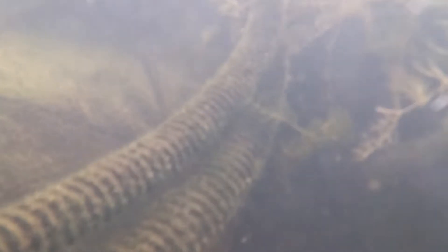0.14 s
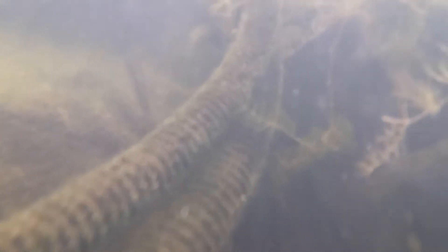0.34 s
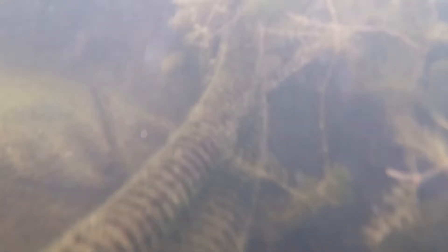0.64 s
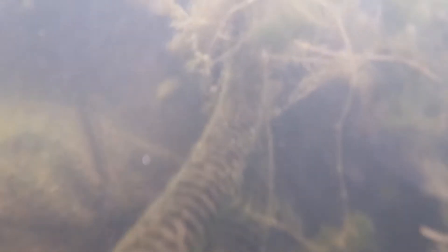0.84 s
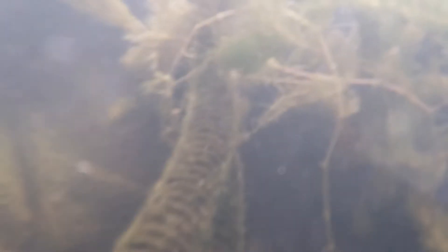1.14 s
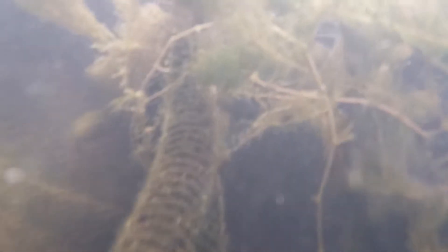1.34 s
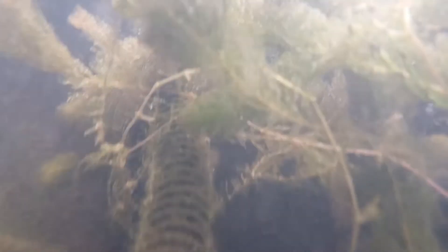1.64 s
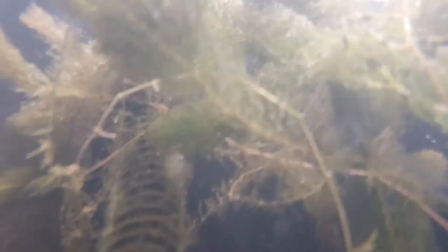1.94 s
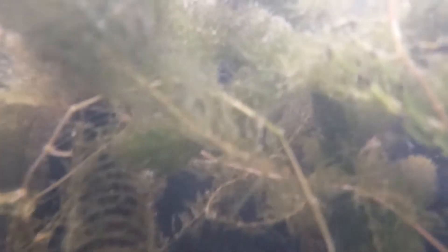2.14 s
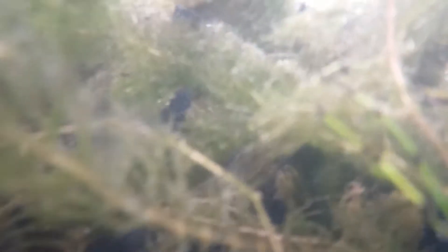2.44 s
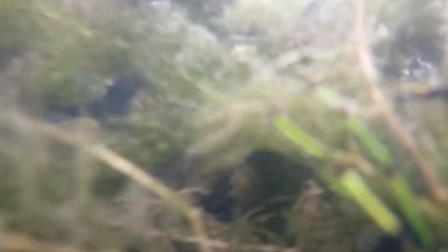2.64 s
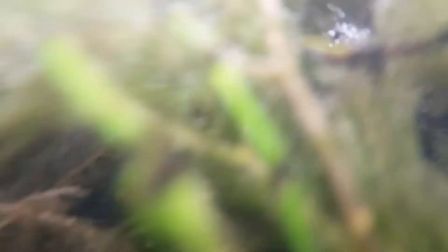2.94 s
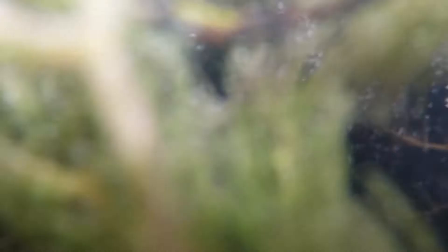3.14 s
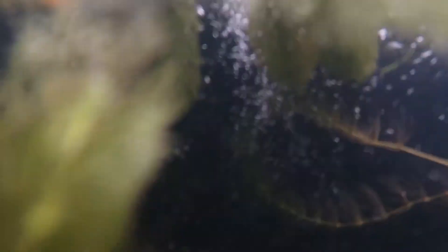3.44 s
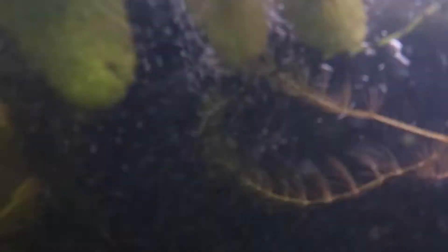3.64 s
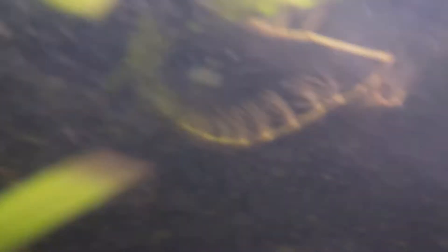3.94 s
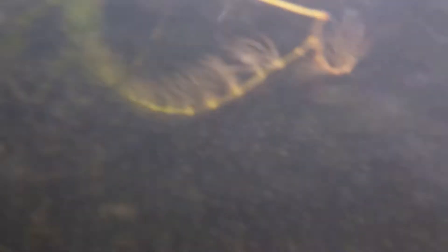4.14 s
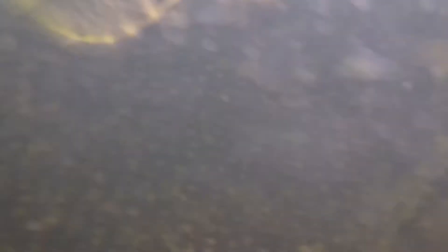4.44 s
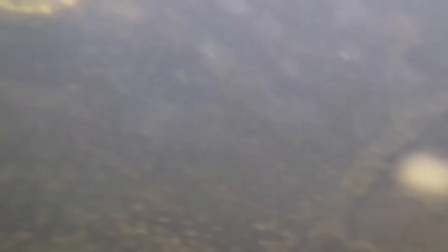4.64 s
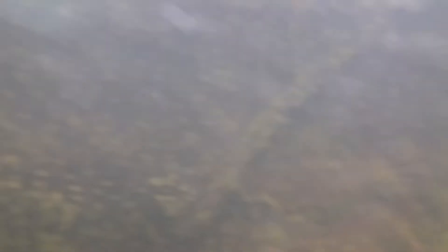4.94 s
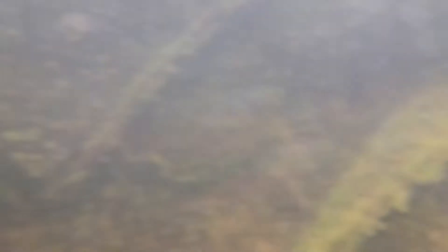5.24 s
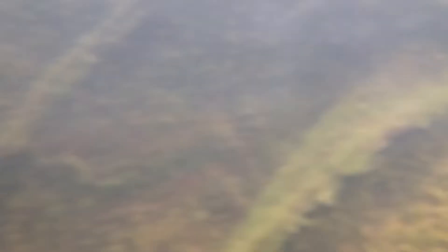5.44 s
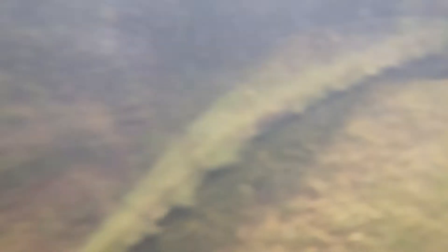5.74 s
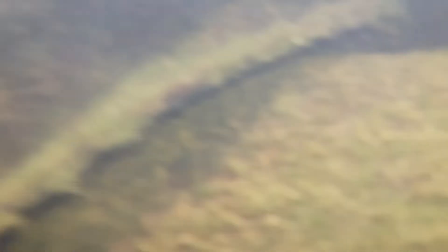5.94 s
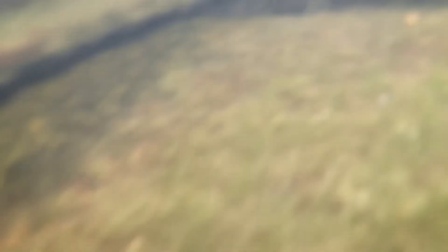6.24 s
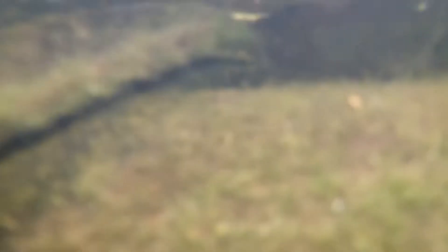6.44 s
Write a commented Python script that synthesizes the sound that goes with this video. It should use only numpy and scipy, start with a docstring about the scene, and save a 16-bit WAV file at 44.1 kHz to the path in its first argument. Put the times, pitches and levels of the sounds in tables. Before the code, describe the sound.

A steady deep electric hum under water, scattered bubble pings, heavy soft bumps and leafy crackle midway, gurgling gulps, and a closing burst of thuds and taps.

```python
"""Underwater glide past a pond pump

A camera glides through a pond while a mains pump hums and buzzes and its rotor ticks in filtered noise.
Bubbles ping all around as dying sines with quick echoes. Weed rustles over the case in clumps of tiny
clicks and bumps it with low swells; the inflow gurgles by in ringing grains and gulps of air.
Hard taps tick and ring the case, most thickly near the end, over rumbling water, wash and hiss."""
import sys
import numpy as np
from scipy import signal
from scipy.fft import rfft, irfft, next_fast_len
from scipy.io import wavfile
from scipy.ndimage import uniform_filter1d

SR = 44100
rng = np.random.default_rng(int(sys.argv[2]) if len(sys.argv) > 2 else 0)


def output_pcm(signal):
    """Save a mono or channel-first signal as 16-bit PCM at the path in sys.argv[1].

    Samples are clipped to [-1, 1] before scaling.
    """
    pcm = np.clip(np.atleast_2d(signal).T, -1, 1) * 32767
    wavfile.write(sys.argv[1], SR, np.round(pcm).astype(np.int16))


N = 290619
T = np.arange(N) / SR  # time in seconds

# Water flowing round the case, following the camera's speed, before the flow trim: start_s, level_db
FLOW_LEVEL = [(0.0, -46), (1.62, -38.5), (2.67, -39), (3.07, -34), (3.54, -35), (3.88, -30.5), (5.28, -39),
              (6.0, -44.5), (6.21, -43), (6.26, -29), (6.59, -32)]
# Tone of the flow's rumble: freq_hz, level_db
FLOW_TONE = [(20, -33), (35, -13.5), (50, -9), (75, -6), (110, -1.5), (155, -1), (200, -9.5), (270, -21.5),
             (400, -26.5), (700, -38.5)]
# Tone of the pond's far wash: freq_hz, level_db
WASH_TONE = [(200, 9), (450, 6.5), (700, -4.5), (1000, 8), (1150, 4), (1350, 6), (1800, -11), (2600, -24),
             (3500, -17), (5000, -40), (8000, -47.5)]
# Tone of the microphone noise: freq_hz, level_db
HISS_TONE = [(100, -6.5), (5000, -1), (9000, 3.5), (16000, 4)]
# Single bubbles standing out, of many sizes: start_s, pitch_hz, level_db (peak)
SINGLE_BUBBLES = [(0.13, 2610, -31), (.571, 2660, -33.5), (.753, 3890, -31), (0.886, 2500, -27),
                  (.986, 3460, -39.5),  (1.038, 2635, -25), (1.242, 2000, -33), (1.312, 3970, -42),
                  (1.335, 1416, -34.5), (1.735, 2470, -26.5), (1.793, 1620, -41), (1.938, 1764, -29.5),
                  (2.008, 3340, -36), (2.163, 1810, -31), (2.459, 3320, -40), (2.519, 1150, -32),
                  (2.736, 1505, -36.5), (2.768, 2500, -23.5), (3.03, 3000, -30), (3.185, 2910, -33),
                  (3.387, 1455, -32.5), (3.883, 1256, -21.5), (3.903, 1560, -29.5), (3.908, 2460, -27),
                  (4.23, 2990, -35.5), (4.45, 2470, -33), (4.934, 4220, -41.5), (5.259, 1106, -21),
                  (5.361, 5340, -40), (5.423, 3010, -38), (5.499, 5360, -46.5), (5.702, 1220, -30.5),
                  (6.197, 2080, -42)]
# Larger gulps of air at the inflow, before the gulp trim: start_s, level_db (peak)
AIR_GULPS = [(4.032, -22.5), (4.147, -23), (4.243, -18.5), (4.265, -17), (4.294, -21), (4.319, -18.5),
             (4.335, -22.5), (4.518, -27), (4.713, -20.5), (4.85, -25.5), (5.001, -32), (5.135, -26.5),
             (5.259, -19), (5.37, -25), (5.7, -29)]
# Tone of the churning inflow: freq_hz, level_db
CHURN_TONE = [(150, -8), (330, 0.5), (440, -4.5), (530, 7), (600, -2), (780, -4), (960, 5.5), (1100, -7),
              (1250, -22.5), (1600, -17), (2200, -37), (3500, -68.5)]
# Weed brushing the case, before the weed trims: fullest_s, swell_s, fade_s, level_db, brightness_db
WEED_STROKES = [(3.1, 0.42, 0.23, -49, -3), (3.42, .14, 0.22, -47.5, -8), (3.74, 0.22, 0.23, -44.5, -7),
                (3.91, 0.069, 0.032, -39, -6), (4.12, 0.21, 0.14, -49.5, -13.5),
                (6.26, 0.057, 0.1, -57, -12), (6.421, 0.08, 0.079, -46, -10.5),
                (6.565, .05, 0.07, -53.5, -23)]
# Tone of the weed's body: freq_hz, level_db
WEED_BODY_TONE = [(120, -8.5), (300, 19), (450, 10.5), (900, 6.5), (1400, -0.5), (2000, 2), (3000, -6),
                  (3700, -20.5), (5000, -45.5)]
# Tone of the weed's fizz: freq_hz, level_db
WEED_FIZZ_TONE = [(2500, 2.5), (3700, -2.5), (5600, -9.5), (6900, -18.5), (7800, -29.5), (11000, -47.5)]
# Soft bumps on the case, before the limiter: start_s, level_db (peak), rise_s
SOFT_BUMPS = [(1.851, -3.5, 0.0087), (3.258, -10.5, 0.0042), (3.358, -12.5, 0.0044), (3.664, 0, 0.0064),
              (3.825, 3.5, 0.0069), (3.882, -8.5, 0.0052), (3.976, -2, 0.006), (4.192, -2.5, 0.0064),
              (4.265, -7, 0.0051), (4.552, -18, 0.0029), (6.021, -9, 0.011), (6.066, 3.5, 0.0069),
              (6.078, -1.5, .011), (6.228, -1.5, 0.006), (6.243, -4, .012), (6.28, -8.5, 0.0046),
              (6.336, -7.5, 0.0061), (6.351, -10.5, 0.0061), (6.404, -8, 0.0084)]
# Hard taps on the case: start_s, tick_db, knock_db, knock_hz
HARD_TAPS = [(1.856, -37.5, -17.5, 333), (3.207, -23, -44, 600), (3.268, -31.5, -38, 350),
             (3.674, -34.5, -20.5, 292), (5.559, -40, -13.5, 310), (5.978, -68, -20, 417),
             (6.022, -39, -17.5, 336), (6.064, -34, -2, 630), (6.239, -38, -16.5, 260)]
# Tone of a tap's tick: freq_hz, level_db
TICK_TONE = [(500, -10), (1500, 4), (3000, -5.5), (5500, -7), (7000, -26), (9000, -35)]
# Tone of the rotor's rattle: freq_hz, level_db
RATTLE_TONE = [(600, -29), (1700, -22), (2150, 9.5), (2600, 4), (3100, 1), (3600, -21.5), (4400, -17),
               (5000, -28.5), (5600, -18), (6800, -32), (9000, -45)]
# Harmonics of the housing's buzz: mains_multiple, level_db (relative)
BUZZ_HARMONICS = [(4, -13.5), (6, 0), (8, -7.5), (10, -31)]
# Quiet spots of the hum's standing wave that the camera crosses: centre_s, depth_db, half_width_s
HUM_QUIET_SPOTS = [(1.6, 5.5, 1), (3.65, 30.5, .42), (4.4, 10.5, .45), (5.25, 5.5, 0.5)]

MAINS_HZ = 49.9
HUM_DB = -23.5  # away from the quiet spots, before the waver
# the rattle fades as the camera drifts off, and by this much more per second once it turns away
RATTLE_DB, DRIFT_DB_PER_S, TURN_S, TURNED_DB_PER_S = -53.5, 1.83, 4.9, 3.5
# extra treble on the rattle: it carries least far, so its boost falls from the start
TREBLE_HZ, TREBLE_DB, TREBLE_LOSS_DB_PER_S = 4800, 7, 22
BUBBLE_CYCLES = 79  # a bubble dies by 60 dB in this many cycles
# the case's pitch at the height of a usual bump, and the share it drops in each rise time
BUMP_HZ, BUMP_SAG = 115.2, 0.05
USUAL_RISE_S, SLOW_POWER = 0.0072, 0.43  # a slower push sounds lower, by this power of its rise time
STROKE_END_DB = -10.5  # level of a weed stroke one swell before or one fade after its fullest
EDGE_HZ = 15800  # top of the band


def amp(db):
    """Turns decibels into gain."""
    return 10 ** (np.asarray(db) / 20)


def unit(x):
    """Scales a signal to rms 1."""
    return x / np.sqrt(np.mean(x ** 2) + 1e-20)


def level(rows):
    """Gain at every sample from start_s, level_db rows, falling to -110 dB just outside them."""
    s, db = np.transpose(rows)
    return amp(np.interp(T, [s[0] - .04, *s, s[-1] + .04], [-110, *db, -110]))


def add(mix, s, sound):
    """Mixes a sound in at time s, trimmed at the end of the mix."""
    part = mix[max(round(s * SR), 0):][:len(sound)]
    part += sound[:len(part)]


def colour(x, points, size=4096):
    """Shapes a sound with a minimum-phase filter through freq_hz, level_db points."""
    hz, db = np.transpose(points)
    f = np.log(abs(np.fft.fftfreq(size, 1 / SR)) + 1)
    # outside the outer points the gain falls 12 dB or more per octave
    beyond = np.maximum(f - np.log(hz[-1]), 0) + np.maximum(np.log(hz[0]) - f, 0)
    log_gain = np.log(amp(np.interp(f, np.log(hz), db))) - 2 * beyond
    filter_taps = np.fft.ifft(np.exp(np.conj(signal.hilbert(log_gain)))).real
    return signal.oaconvolve(x, filter_taps[:size // 2])[:len(x)]


def wander(rate_hz):
    """Slow random drift of rms 1, with little movement faster than rate_hz."""
    n = next_fast_len(N)
    spectrum = rfft(rng.standard_normal(n))
    softening = 1 + (np.fft.rfftfreq(n, 1 / SR) / rate_hz) ** 4
    return unit(irfft(spectrum / softening, n)[:N])


def grains(per_s, spread_db):
    """Random clicks of either sign, mostly small and a few large."""
    size = amp(spread_db * np.minimum(rng.exponential(1, N), 4))
    return size * rng.choice([-1, 1], N) * (rng.random(N) < per_s / SR)


def ring(hz, t60, glide=0, onset_s=.0001):
    """A dying sine, down 60 dB at t60 seconds, whose pitch rises by the share glide as it fades."""
    t = T[:SR // 8]
    envelope = amp(-60 * t / t60) * (1 - np.exp(-(t / onset_s) ** 2))
    return envelope * np.sin(2 * np.pi * hz * t * (1 + glide * np.minimum(t / t60, 1) / 2))


def echoes(x, wet_db=-9, t60=0.0073, count=24):
    """The surface and the liner send back a quick scatter of reflections."""
    delay_s = rng.uniform(.001, .025, count)
    size = rng.choice([-1, 1], count) * amp(-60 * delay_s / t60)
    response = np.bincount((delay_s * SR).astype(int), size)
    return x + amp(wet_db) * signal.oaconvolve(x, response / np.linalg.norm(response))[:N]


def passing(db, arrival_s, stay_s, rise_db_per_s, sag_db_per_s, fall_db_per_s):
    """Gain that rises until arrival, sags through the stay, then falls (or swells if fall is negative)."""
    t = T - arrival_s
    approach_db = rise_db_per_s * np.minimum(t, 0)
    sag_db = sag_db_per_s * np.clip(t, 0, stay_s)
    leave_db = fall_db_per_s * np.maximum(t - stay_s, 0)
    return amp(db + approach_db - sag_db - leave_db)


def standing_wave():
    """Gain of the hum along the camera's path, dipping at each quiet spot."""
    dips_db = sum(db * np.exp(-((T - s) / width) ** 2) for s, db, width in HUM_QUIET_SPOTS)
    return amp(HUM_DB - dips_db)


def pump_nearness():
    """Gain of the pump's small noises as the camera drifts away."""
    return amp(RATTLE_DB - DRIFT_DB_PER_S * T - TURNED_DB_PER_S * np.maximum(T - TURN_S, 0))


def churn_nearness():
    """Gain of the inflow as the camera comes out of the weed and drifts past."""
    return passing(db=-35, arrival_s=3.95, stay_s=1.8, rise_db_per_s=28.5, sag_db_per_s=6.0, fall_db_per_s=30)


def water(flow_db=6.5, lump_db=3, wash_db=0, flicker_db=4.5, hiss_db=-69.5):
    """Lumpy rumble of water round the case, the pond's far wash, and microphone hiss."""
    low, mid, high = rng.standard_normal((3, N))
    flow = level(FLOW_LEVEL) * amp(flow_db + lump_db * wander(10.3)) * unit(colour(low, FLOW_TONE))
    # the wash sags through its stay, then creeps up again
    near = passing(db=-51.0, arrival_s=3.4, stay_s=2.3, rise_db_per_s=5.0, sag_db_per_s=5, fall_db_per_s=-1.8)
    wash = near * amp(wash_db + flicker_db * wander(33)) * unit(colour(mid, WASH_TONE))
    return flow + wash + amp(hiss_db) * unit(colour(high, HISS_TONE))


def current(db=-38.0):
    """The pump's current keeps up a deep, even rumble."""
    tone = [(32, -23.5), (50, -3), (80, -5), (130, -27.5)]  # freq_hz, level_db
    return amp(db) * unit(colour(rng.standard_normal(N), tone))


def small_bubbles(gain_db=-33, count=28):
    """Faint pings of many sizes come in little flurries, loudest near the pump."""
    per_s, spread_db, flurry_db = 1.7, 2.7, 3.5  # rate at each pitch
    pings = np.zeros(N)
    for hz in np.geomspace(1350, 4400, count):
        ping = ring(hz, BUBBLE_CYCLES / hz, 0.029, 2 / hz)
        pings += signal.oaconvolve(grains(per_s, spread_db), ping)[:N]
    tone = [(1400, -8), (1900, -8), (2600, 0), (4400, -6)]  # freq_hz, level_db
    flurries = colour(pings * amp(flurry_db * wander(7)), tone)
    return amp(gain_db) * np.sqrt(pump_nearness()) * unit(flurries)


def bubbles(gain_db=0, glide=0.01, onset_s=0.00026):
    """Each new bubble rings at the pitch of its size, rising slightly; large ones ring longer."""
    out = np.zeros(N)
    for s, hz, db in SINGLE_BUBBLES:
        add(out, s, amp(db + gain_db) * ring(hz, BUBBLE_CYCLES / hz, glide, onset_s))
    return out


def blips(gain_db=-9.0, cycles=24, count=16):
    """Pockets of air of many sizes wobble in the churning water."""
    per_s, spread_db = 2, 2.4  # rate at each pitch
    out = np.zeros(N)
    for hz in np.geomspace(480, 1150, count):
        blip = ring(hz, cycles / hz, .1, 3.5 / hz)
        out += signal.oaconvolve(grains(per_s, spread_db), blip)[:N]
    return amp(gain_db) * churn_nearness() * unit(out)


def inflow(churn_db=-3, gulp_db=2.5, air_hz=980):
    """Falling water drives air under the surface: churning and single gulps ring the same pocket of water."""
    slosh, slosh_s = .05, .008  # share of noise after each push, and its decay
    per_s, spread_db, surge_db = 170, 2.7, 2
    air_db, air_t60, air_spread, air_glide = -8, .04, .08, .12
    out, t = np.zeros(N), T[:SR // 16]
    for s, db in AIR_GULPS:
        push = (t == 0) + slosh * np.exp(-t / slosh_s) * rng.standard_normal(len(t))
        gulp = colour(push, CHURN_TONE)
        add(out, s, amp(db + gulp_db) * gulp / abs(gulp).max())
        # the trapped air rings on as a large bubble, rising in pitch
        hz = air_hz * (1 + air_spread * rng.standard_normal())
        add(out, s, amp(db + gulp_db + air_db) * ring(hz, air_t60, air_glide, 2 / hz))
    churn = unit(colour(grains(per_s, spread_db), CHURN_TONE))
    return out + amp(churn_db + surge_db * wander(37)) * churn_nearness() * churn


def weed(body_db=9, fizz_db=0):
    """Fine leaves slip over the case in clumps of tiny clicks."""
    per_s, spread_db, clump_db = 2000, 4.4, 2.2
    slips = grains(per_s, spread_db) * amp(clump_db * wander(40))
    body = unit(colour(slips, WEED_BODY_TONE))
    fizz = unit(colour(slips, WEED_FIZZ_TONE))
    s, swell_s, fade_s, db, bright_db = np.transpose(WEED_STROKES)[:, :, None]
    # each stroke is an arch in decibels; the loudest stroke rules at each moment
    arch = np.minimum(((T - s) / np.where(T < s, swell_s, fade_s)) ** 2, 10)
    stroke_db = db + STROKE_END_DB * arch
    body_gain = amp(stroke_db.max(0) + body_db)
    fizz_gain = amp((stroke_db + bright_db).max(0) + fizz_db)
    return body * body_gain + fizz * fizz_gain


def bumps(gain_db=0):
    """Stems push on the case, which answers with a few low cycles that slow as the push lets go."""
    out, t = np.zeros(N), T[:SR // 8]
    for s, db, rise in SOFT_BUMPS:
        swell = (t / rise * np.exp(1 - t / rise)) ** 3
        hz = BUMP_HZ * (USUAL_RISE_S / rise) ** SLOW_POWER
        # cycles counted from the height of the bump
        turns = hz * rise * (1 - np.exp(BUMP_SAG * (1 - t / rise))) / BUMP_SAG
        add(out, s, -amp(db + gain_db) * swell * np.cos(2 * np.pi * turns))
    return out


def taps(cycles=6, tick_s=0.0015):
    """A hard contact: a bright tick and one quickly damped ring of the case."""
    out, t = np.zeros(N), T[:SR // 20]
    for s, tick_db, knock_db, hz in HARD_TAPS:
        tick = colour(np.exp(-t / tick_s) * rng.standard_normal(len(t)), TICK_TONE)
        add(out, s, amp(tick_db) * tick / abs(tick).max())
        add(out, s, amp(knock_db) * ring(hz, cycles / hz, onset_s=0.15 / hz))
    return out


def rotor(grind_db=-18, click_db=13):
    """The rotor knocks and rubs its bearing once a turn, more softly half a turn later."""
    first_s, rub_s, back_db, uneven_db, wobble_db = .0036, .0008, -9.5, 3, 3.5
    age = (T - first_s) % (.5 / MAINS_HZ) / rub_s  # time since the last blow, in rub times
    blow = np.floor((T - first_s) * 2 * MAINS_HZ).astype(int) + 2
    # the loose shaft wobbles, so that every third turn lands harder
    leaning = blow % 6 == 2
    uneven = uneven_db * rng.standard_normal(blow.max() + 1)[blow]
    force = amp(uneven + back_db * (blow % 2) + wobble_db * leaning)
    # the knock clicks where the rub is strongest
    knock = np.diff((age > 1).astype(int), prepend=0) > 0
    rub = (force * age * np.exp(1 - age) + amp(grind_db)) * rng.standard_normal(N)
    rattle = colour(rub + amp(click_db) * force * knock, RATTLE_TONE)
    chatter_db = 1.2 * wander(7)
    rattle = unit(rattle * amp(chatter_db))
    high_pass = signal.butter(4, TREBLE_HZ, "high", fs=SR, output="sos")
    treble = signal.sosfiltfilt(high_pass, rattle)
    return pump_nearness() * (rattle + amp(TREBLE_DB - TREBLE_LOSS_DB_PER_S * T) * treble)


def hum(waver_db=1, buzz_waver_db=-0.5):
    """The motor's iron flexes twice a mains cycle and buzzes its housing."""
    turn = 2 * np.pi * MAINS_HZ * T
    buzz = sum(amp(db) * np.cos(round(k) * turn + k) for k, db in BUZZ_HARMONICS)
    low = np.sin(2 * turn) * standing_wave() * amp(waver_db * wander(3.7))
    near = passing(db=-38.5, arrival_s=1.16, stay_s=1.69, rise_db_per_s=5, sag_db_per_s=1.4, fall_db_per_s=9.5)
    # root two brings a sine to rms 1
    return np.sqrt(2) * (low + buzz * near * amp(buzz_waver_db * wander(4.3)))


def scene():
    """Everything reaches one microphone through the camera's case."""
    background = water() + current()
    pings = echoes(bubbles() + small_bubbles())
    gurgle = blips() + inflow()
    contacts = weed() + bumps() + taps()
    pump = rotor() + hum()
    return (background + pings + gurgle + contacts + pump)[None]


def record(dry, low_cut_hz=38, recover_db_per_s=40):
    """The microphone sheds the deepest bass, a limiter holds down the hardest bumps; then the band limit."""
    low_cut = signal.butter(3, low_cut_hz, "high", fs=SR, output="sos")
    sound = signal.sosfiltfilt(low_cut, dry[0])
    over_db = np.maximum(20 * np.log10(abs(sound) + 1e-9) + 1, 0)  # threshold at -1 dB
    # each peak is held down, then let go at a steady rate
    held_db = np.maximum.accumulate(over_db + recover_db_per_s * T) - recover_db_per_s * T
    limited = sound * amp(-uniform_filter1d(held_db, size=64))
    band_limit = signal.firwin(511, EDGE_HZ, window=("kaiser", 9), fs=SR)
    return signal.oaconvolve(limited, band_limit, "same")[None]


dry = scene()
out = record(dry)
output_pcm(out)
```